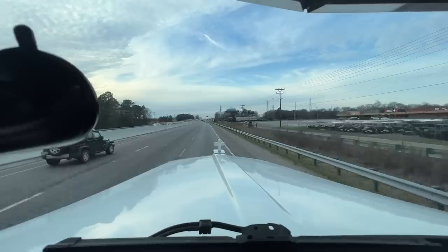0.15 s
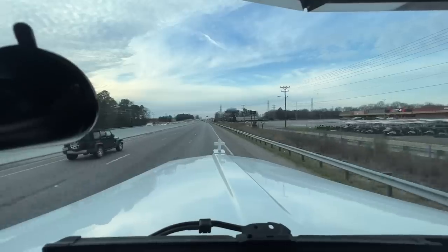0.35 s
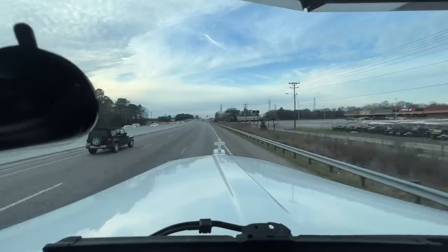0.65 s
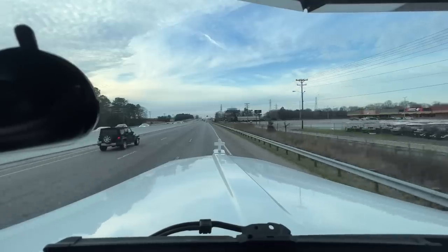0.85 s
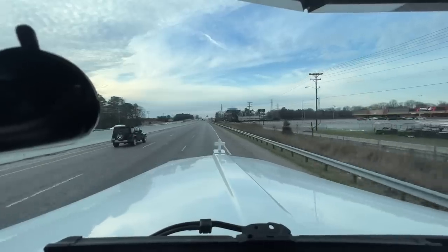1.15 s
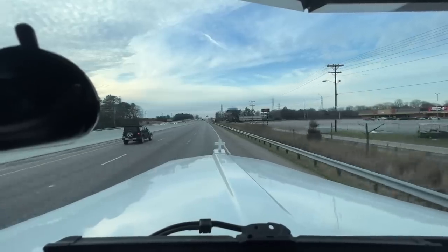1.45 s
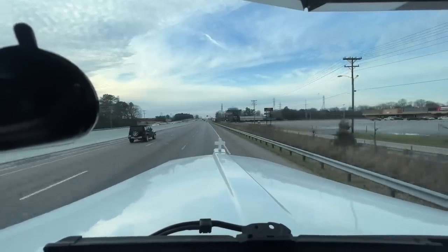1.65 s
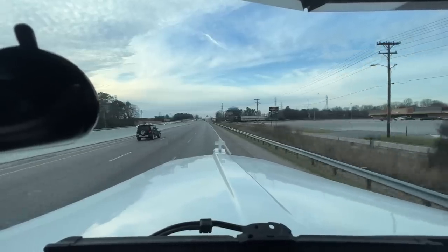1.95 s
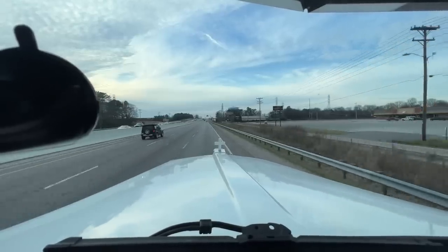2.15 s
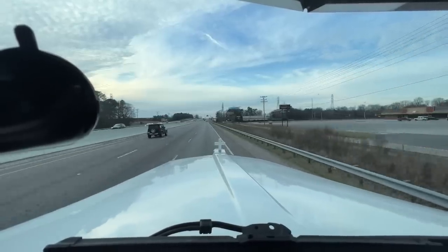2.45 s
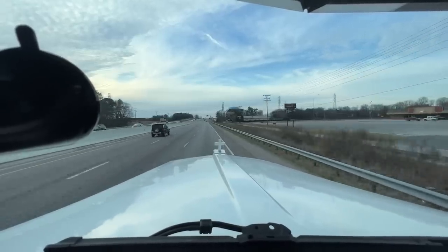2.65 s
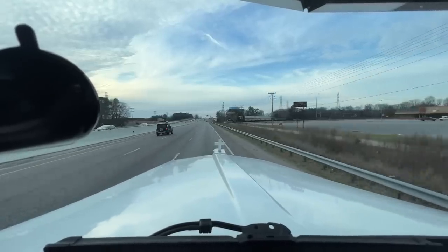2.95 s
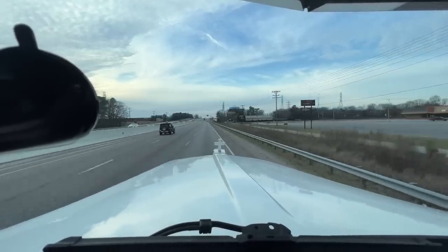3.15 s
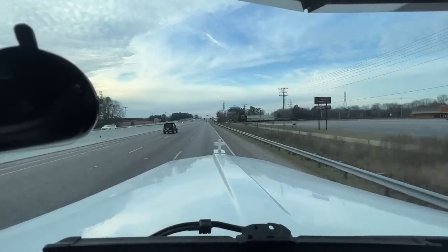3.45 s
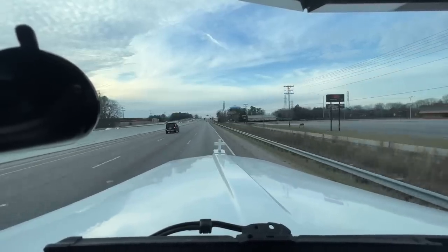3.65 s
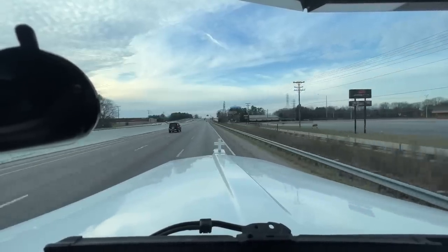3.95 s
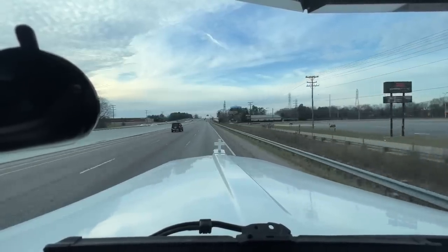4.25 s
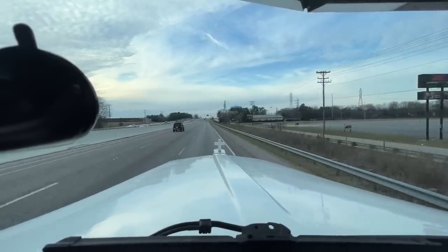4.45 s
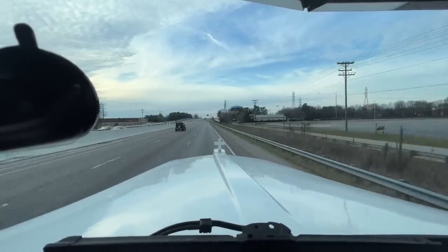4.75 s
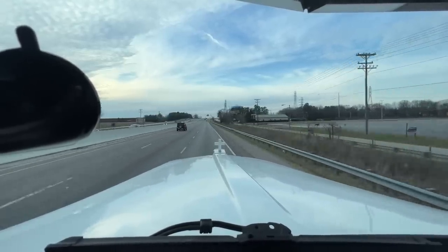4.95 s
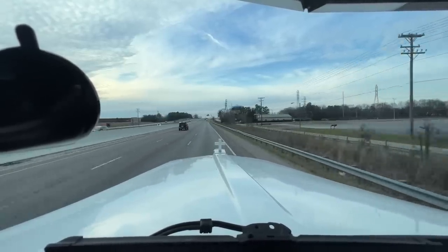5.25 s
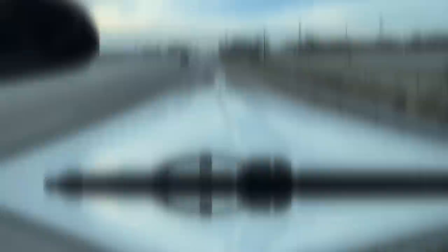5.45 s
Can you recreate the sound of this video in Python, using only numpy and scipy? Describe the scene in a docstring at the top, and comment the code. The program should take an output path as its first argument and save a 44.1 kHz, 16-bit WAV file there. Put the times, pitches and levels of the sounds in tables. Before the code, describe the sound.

Heavy diesel drone and road rumble in a cab, turbo whistle sagging and climbing around a gear change, then an abrupt droning, hissing end.

```python
"""A six-cylinder truck diesel heard in the cab: it pulls, lifts off for an upshift and pulls again at lower revs.
Shaft orders are sines through cab booms; firing-modulated noise roars and noise bursts knock, both in the panels.
Under them: shaped-noise road rumble and air rush, and a jittered-sine turbo whistle that sags and spools up.
Near the end a lower drone cuts in with a click, air spurts out and a panel is tapped. Two microphones."""
import sys
import numpy as np
from scipy import signal
from scipy.fft import rfft, irfft, next_fast_len
from scipy.io import wavfile
from scipy.ndimage import uniform_filter1d, map_coordinates

SR = 44100
rng = np.random.default_rng(int(sys.argv[2]) if len(sys.argv) > 2 else 0)


def wrap_up_sound(samples):
    """Save the sound to the file named by the first command line argument, as 16-bit audio."""
    columns = np.atleast_2d(samples).T
    # keep every value between -1 and 1, then stretch to whole-number steps
    tamed = np.clip(columns, -1, 1)
    steps = np.round(tamed * 32767).astype(np.int16)
    wavfile.write(sys.argv[1], SR, steps)


N = 247401
TIME = np.arange(N) / SR

# crankshaft speed: time_s, turns_per_s
SPEED_CURVE = [(0, 27.7), (1.15, 28.55), (1.6, 28.3), (1.72, 27.8), (1.9, 26.6), (2.0, 25.1), (2.11, 23.6),
               (2.27, 24.5), (2.65, 24.4), (3.05, 24.22), (5.61, 25.62)]
# reference level of roar and knock: time_s, level_db
COMBUSTION_LEVEL = [(0.0, -34.5), (0.06, -34), (0.48, -35), (0.6, -34.5), (0.65, -37), (0.68, -33.5),
                    (1.19, -36.5), (1.95, -46), (2.6, -46), (2.9, -41.5), (3.3, -39), (3.79, -37),
                    (5.4, -36)]
# combustion noise spectrum before the panels: freq_hz, relative_db_per_hz
ROAR_SPECTRUM = [(60, -28.5), (150, 1), (280, 5), (360, -5.5), (430, 2), (500, -3), (570, -8), (660, -1),
                 (750, -4.5), (850, -3.5), (1050, -12.5), (1180, -15.5), (1600, -10), (2000, -17.5),
                 (2600, -24.5), (4000, -66.5)]
# panel resonances: freq_hz, width_hz, boost_db
PANEL_MODES = [(634, 42, 5.5), (735.3, 19, 10), (794, 21, 1.5), (889, 17, 5), (1046, 59, 6.5),
               (1164, 21, 0.5), (1320, 22, 5.5), (1430, 23, 6.5), (1670, 37, 6.5), (1760, 47, 2),
               (1967, 46, 5.5)]


def amp(db):
    """Amplitude factor of a level in dB."""
    return 10 ** (np.asarray(db) / 20)


def unit(x):
    """x scaled to rms 1."""
    return x / np.sqrt(np.mean(x ** 2) + 1e-20)


def along(points, hz):
    """(Hz, value) points interpolated on a log frequency axis."""
    f, v = np.transpose(points)
    return np.interp(np.log(hz + 1), np.log(f + 1), v)


def curves(rows):
    """One value per sample for each column after the time."""
    s, *cols = np.transpose(rows)
    return [np.interp(TIME, s, c) for c in cols]


def wobble(knots_per_s):
    """Random curve, linear between normally distributed knots."""
    knots = rng.standard_normal(int(N * knots_per_s / SR) + 4)
    return map_coordinates(knots, [TIME * knots_per_s], order=1)


def filtered(x, response, ends="odd"):
    """x times a complex response of frequency; mirrored ends keep the edges quiet."""
    pad = 4096
    x = np.pad(x, [(0, 0)] * (x.ndim - 1) + [(pad, pad)], mode="reflect", reflect_type=ends)
    m = next_fast_len(x.shape[-1] + 2 * pad)
    spectrum = rfft(x, m) * response(np.fft.rfftfreq(m, 1 / SR))
    return irfft(spectrum, m)[..., pad:pad + N]


def lifted(x, modes):
    """x with a resonant boost in dB at each (Hz, width Hz, dB) mode."""
    def response(f):
        return amp(sum(db / (1 + (2 * (f - hz) / width_hz) ** 2) for hz, width_hz, db in modes))
    return filtered(x, response)


def rush(spectrum, patchy_db):
    """Two partly alike shaped noises of rms 1, with random gain patches in time and frequency."""
    # likeness of the two sides: freq_hz, coherence_0_to_1
    likeness = [(60, 0.73), (200, 0.76), (300, 0.081), (550, 0.81), (900, 0.48), (1300, 0.082),
                (1600, 0.61), (2500, 0.06), (5000, 0.1), (9500, 0.091)]
    z = signal.stft(rng.standard_normal((2, N)), nperseg=512)[2]
    patches = uniform_filter1d(rng.standard_normal(z.shape[1:]), 5, 0)
    patches = unit(uniform_filter1d(patches, 10, 1))
    both = signal.istft(z * amp(patchy_db * patches), nperseg=512)[1][:, :N]

    def response(hz):
        turn = np.arccos(np.clip(along(likeness, hz), 0, 1)) / 2
        return amp(along(spectrum, hz)) * [np.cos(turn), np.sin(turn)]
    mid, side = filtered(both, response, ends="even")
    return unit(np.array([mid + side, mid - side]))


def pair(x, late_rad):
    """Both microphones: level balance, and the left one late by late_rad(Hz)."""
    # left minus right: freq_hz, balance_db
    balance = [(60, -0.5), (110, -2.5), (148, -2.5), (168, -6.5), (200, -6.5), (228, -1), (265, -12.5),
               (350, -8), (410, -5), (480, -3.5), (800, -4), (1100, -2), (1350, -6.5), (2000, -3),
               (3330, -6), (5500, -13.5), (9080, -2.5), (15000, 1.5)]
    side = np.array([[.5], [-.5]])
    return filtered(x, lambda hz: amp(side * along(balance, hz)) * np.exp(-1j * side * late_rad(hz)))


def standing(hz):
    """Phase for sound filling the cab: standing waves put the microphones in step or in opposition."""
    # freq_hz, left_lag_rad
    standing_phase = [(60, .35), (110, .1), (155, -.45), (190, .2), (240, .4), (265, 3.1), (355, 3.4),
                      (380, 6.3), (445, 6.2), (470, 3.1), (1120, 3.4), (1200, 6), (1390, 5.8), (1440, 3.1),
                      (2100, 3.6)]
    return along(standing_phase, hz)


def direct(lag_ms):
    """Phase for sound arriving straight from one side: a pure delay."""
    return lambda hz: 2 * np.pi * hz * lag_ms / 1000


def aside(hz):
    """Phase for the whistle, which comes from one side and off the glass."""
    # freq_hz, left_lag_rad
    whistle_phase = [(7150, 6), (7950, 5.4), (9380, 5), (10100, 3.65), (11150, 2.1), (12150, 0),
                     (12900, -1.3), (13600, -2.6)]
    return along(whistle_phase, hz)


def crank_turns():
    """Crankshaft turns so far: the integral of its speed."""
    return np.cumsum(curves(SPEED_CURVE)[0]) / SR


def road():
    """Tyre rumble through the humming floor, and air rushing past the cab and the intake."""
    # tyre noise: freq_hz, relative_db_per_hz
    road_spectrum = [(20, -58.5), (40, -1.5), (62, 8.5), (85, -3), (120, 5), (200, -9), (300, -8.5),
                     (450, -13.5), (620, -15), (800, -59.5)]
    # cab floor resonances: freq_hz, width_hz, boost_db
    floor_modes = [(63.4, 4.4, 7), (128, 12, 4)]
    # air noise: freq_hz, relative_db_per_hz
    air_spectrum = [(1000, -2), (2500, 4.5), (3500, 3), (5000, -1), (7000, -2), (8200, -7.5), (9400, -10),
                    (10200, -56), (11200, -17.5), (12800, -27.5), (15000, -52.5)]
    # air rush before its overall gain: time_s, relative_level_db
    air_level = [(0.0, -42), (0.01, -44.5), (0.7, -44.5), (1.26, -47), (1.72, -51.5), (2.85, -55),
                 (2.92, -52), (4.3, -47), (5.38, -46.5)]
    air_gain_db = 4
    rumble = unit(lifted(rush(road_spectrum, patchy_db=2.0), floor_modes))
    rumble = amp(-28.5 + 1.3 * wobble(3.5)) * rumble
    return rumble + amp(curves(air_level)[0] + air_gain_db) * rush(air_spectrum, patchy_db=1.18)


def turbo():
    """Compressor whistle: a thin line that frays into a band of air noise as the rotor runs faster."""
    # time_s, whistle_hz
    whistle_pitch = [(0, 13600), (.6, 13560), (.95, 13450), (1.1, 13250), (1.3, 12900), (1.5, 12150),
                     (1.7, 11150), (1.95, 9500), (2.2, 8330), (2.47, 7260), (2.66, 7150), (2.8, 7260),
                     (2.95, 7720), (3.3, 8930), (3.8, 10450), (4.2, 11470), (4.5, 11880), (5, 12270),
                     (5.61, 12430)]
    # before flicker and haze: time_s, level_db
    whistle_level = [(0, -53), (1.1, -55), (1.5, -61), (1.72, -53.5), (1.85, -55), (2.1, -56), (2.3, -59.5),
                     (2.5, -50.5), (2.65, -60), (2.85, -53), (3, -61), (3.3, -57), (3.5, -59), (3.67, -43),
                     (3.8, -56), (4.3, -57), (5.61, -58)]
    fray_hz = 9500  # fraying grows quickly above this pitch
    hz, = curves(whistle_pitch)
    glide_hz = uniform_filter1d(hz, size=SR // 10, mode="nearest")  # the rotor's inertia rounds every change
    fray = 1 + (glide_hz / fray_hz) ** 3
    jitter_hz = 17 * fray * wobble(140)
    angle = 2 * np.pi * np.cumsum(glide_hz + jitter_hz) / SR
    haze = unit(filtered(rng.standard_normal(N), lambda f: 1 / (1 + (f / 550) ** 4), ends="even"))
    flicker = amp(3 * wobble(40) + 2.5 * wobble(12))
    envelope = amp(curves(whistle_level)[0]) * (flicker + .2 * fray * haze)
    return envelope * np.sqrt(2) * np.sin(angle)


def puff():
    """Spurts of air: each rises fast, falls slower and swishes around its own pitch."""
    # broad hiss: freq_hz, relative_db_per_hz
    puff_spectrum = [(2500, -7.5), (4500, -5), (6500, -1), (8000, -3), (10200, -9.5), (11200, -17),
                     (15500, -37.5)]
    # spurts: peak_s, envelope_peak_db, centre_hz
    spurts = [(5.44, -37.5, 4760), (5.455, -38.5, 6630), (5.461, -47, 4870), (5.466, -37.5, 6300),
              (5.477, -42.5, 5600), (5.49, -45, 5500)]
    rise_db_per_s, fall_db_per_s = 2500, 1500
    width_octaves, hiss_share = .7, .6
    air, out = rush(puff_spectrum, patchy_db=2.5), 0
    for s, db, hz in spurts:
        edges_hz = hz * 2 ** (width_octaves * np.array([-.5, .5]))
        band = signal.butter(1, edges_hz, "band", fs=SR, output="sos")
        envelope = amp(db - np.maximum(rise_db_per_s * (s - TIME), fall_db_per_s * (TIME - s)))
        swish = unit(signal.sosfilt(band, air))
        out = out + envelope * (swish + hiss_share * air)
    return out


def tap():
    """A tapped panel: one decaying sine."""
    start_s, pitch_hz, level_db, t60_s = 5.527, 760, -23, .06
    t = np.clip(TIME - start_s, 0, None)
    return amp(level_db - 60 * t / t60_s) * np.sin(2 * np.pi * pitch_hz * t)


def ending():
    """A lower drone and its roar start abruptly with a decaying step as click; puff and tap follow."""
    # steady tones: pitch_hz, rms_db
    drone_tones = [(44, -35), (65, -16.5), (87, -24), (108, -21.5), (130, -18), (175, -36), (222, -28),
                   (330, -31)]
    # low booms the drone swells into: centre_s, pitch_hz, peak_db
    low_booms = [(5.429, 96, -16), (5.523, 80, -13.5), (5.559, 116.6, -8.5)]
    start_s, boom_sigma_s = 5.412, .014
    since = np.clip(TIME - start_s, 0, None)
    drone = np.zeros(N)
    for hz, db in drone_tones:
        level = amp(db + 2.4 * wobble(4.3)) * np.sqrt(2)
        drone += level * np.sin(2 * np.pi * hz * TIME + rng.uniform(0, 2 * np.pi))
    for s, hz, db in low_booms:
        bell = amp(db) * np.exp(-.5 * ((TIME - s) / boom_sigma_s) ** 2)
        drone -= bell * np.cos(2 * np.pi * hz * (TIME - s))
    onset = 1 - np.exp(-since / 0.0013)
    click = np.exp(-since / 0.001) * (since > 0) * amp([[-20], [-10]])  # left, right
    noise = amp(-29) * unit(lifted(rush(ROAR_SPECTRUM, patchy_db=2.5), PANEL_MODES))
    return pair(onset * (drone + noise), standing) + pair(puff() + tap(), direct(lag_ms=-0.2)) + click


def roar():
    """Combustion noise rings in the panels and swells a little at every firing and twice a turn."""
    roar_gain_db = 6.5  # over the combustion level
    angle = 2 * np.pi * crank_turns()
    firing = 1 + 0.034 * np.cos(3 * angle) + 0.019 * np.cos(2 * angle)
    noise = unit(lifted(firing * rush(ROAR_SPECTRUM, patchy_db=1.53), PANEL_MODES))
    return amp(curves(COMBUSTION_LEVEL)[0] + roar_gain_db) * noise


def knock():
    """Every firing raps the block with a noise burst; cylinders differ in strength, and the panels ring."""
    # rap spectrum before the panels: freq_hz, relative_db_per_hz
    knock_spectrum = [(450, -59.5), (600, -1), (800, 7.5), (1150, -8), (1600, -16), (2600, -21),
                      (4500, -27.5), (6000, -57.5)]
    knock_gain_db = -8  # over the combustion level
    cylinder_spread_db, firing_spread_db = 3, 2
    firings = np.floor(3 * crank_turns()).astype(int)  # three a turn
    at = np.flatnonzero(np.diff(firings))
    cylinders_db = cylinder_spread_db * unit(rng.standard_normal(6))
    raps = np.zeros(N)
    raps[at] = amp(cylinders_db[firings[at] % 6] + firing_spread_db * rng.standard_normal(len(at)))
    t = np.arange(SR // 20) / SR
    block = rng.standard_normal((2, len(t))) * amp(-60 * t / 0.05)
    rung = signal.fftconvolve(raps[None], block, axes=1)[:, :N]
    rung = filtered(rung, lambda hz: amp(along(knock_spectrum, hz)))
    return amp(curves(COMBUSTION_LEVEL)[0] + knock_gain_db) * unit(lifted(rung, PANEL_MODES))


def half_orders(angle, high_db):
    """Weak, unsteady sines between the shaft orders, from unequal cylinders."""
    # order, gain_db over high_db
    half_pattern = [(3.5, -19), (4.5, -10), (5.5, -20), (6.5, -17), (7.5, -19), (8.5, -22), (10.5, -14),
                    (11.5, -21), (13.5, -21), (15.5, -24)]
    out = np.zeros(N)
    for k, db in half_pattern:
        phase = rng.uniform(0, 2 * np.pi) + .4 * wobble(5)
        out += amp(db + high_db + 2 * wobble(6)) * np.sin(k * angle + phase)
    return out


def clutch_shudder():
    """Decaying sine as the clutch bites."""
    # level_db, t60_s
    level_db, t60_s = (-27, 0.74)
    start_s, pitch_hz = 2.74, 246
    t = np.clip(TIME - start_s, 0, None)
    return amp(level_db - 60 * t / t60_s) * (1 - np.exp(-t / 0.012)) * np.sin(2 * np.pi * pitch_hz * t)


def engine():
    """Shaft orders as sines locked to the crank, through the booms of the cab, plus half orders."""
    # order group gains: time_s, orders_1_to_4_db, order_5_db, higher_orders_db
    order_gains = [(0.0, -25.5, -22, -18.5), (0.6, -26.5, -24, -22), (1.2, -26, -26.5, -25),
                   (1.45, -26, -45, -29), (1.6, -30, -37.5, -38.5), (1.72, -31, -34.5, -37.5),
                   (1.83, -26.5, -37.5, -35), (1.95, -26.5, -31, -53), (2.1, -28.5, -28, -50),
                   (2.55, -34.5, -32, -45), (2.7, -30, -25.5, -39.5), (2.82, -28, -29.5, -24),
                   (2.95, -23.5, -32.5, -21), (3.15, -24, -27.5, -19), (3.5, -22, -23.5, -20),
                   (4.1, -21, -29, -19), (4.7, -19.5, -26, -19), (5.3, -22.5, -28, -19.5),
                   (5.45, -17.5, -26.5, -18), (5.6, -31, -25.5, -18)]
    # pattern before the shift: order, relative_db
    fast_pattern = [(1, -28), (2, -22), (3, 0.5), (4, 3.5), (5, -4), (6, -1.5), (7, -6.5), (8, -2),
                    (9, -8.5), (10, -1.5), (11, -11), (12, -14), (13, -27), (14, -9), (15, -18), (16, -18),
                    (17, -8), (18, -26)]
    # pattern after the shift: order, relative_db
    slow_pattern = [(1, -47), (2, -21.5), (3, 1), (4, -8), (5, 0), (6, 1.5), (7, -11.5), (8, -11),
                    (9, -9.5), (10, -12.5), (11, -9.5), (12, -19.5), (13, -11.5), (14, -24.5), (15, -22),
                    (16, -18), (17, -14.5), (18, -20), (19, -15.5), (20, -37)]
    # pattern with fuel off: order, relative_db
    coast_pattern = [(2, -20), (3, 2), (4, -0.5), (5, -4), (6, -10.5), (7, 2.5), (8, -2), (9, -2.5),
                     (10, 4), (11, -3), (12, -10.5), (13, 1.5), (14, -10), (15, -25)]
    # pattern mix, the rest coasts: time_s, fast_share, slow_share
    shift_mix = [(1.45, 1, 0), (1.7, 0, 0), (2.68, 0, 0), (2.9, 0, 1)]
    # time_s, driveline_unloaded_0_to_1
    unloading = [(1.25, 0), (1.5, 1), (2.7, 1), (3.1, 0)]
    # narrow cab booms: freq_hz, width_hz, boost_db
    cab_modes = [(102.1, 2, 6.5), (146.9, 5.5, 5), (203, 5.8, 11), (253.95, 6.4, 13), (290.3, 6.2, 5.5),
                 (340.6, 12, 6.5), (408.7, 8.6, 2), (425.5, 8.2, 8), (450, 4.5, 2.5)]
    smear_rad = .6  # per order squared, outside the fast pattern: the thump of each turn is spread out
    uneven_rad = 1.5  # fast pattern, orders between the firing orders: one of three pulses a turn is stronger
    loose_db, loose_rad, loose_knots_per_s = 3.5, .7, 7  # off load: flicker in level, drift in phase
    firm_orders = 11  # orders below this loosen less
    low_db, fifth_db, high_db = curves(order_gains)
    angle = 2 * np.pi * crank_turns()
    fast, slow = curves(shift_mix)
    unloaded, = curves(unloading)
    fast_db, slow_db, coast_db = dict(fast_pattern), dict(slow_pattern), dict(coast_pattern)
    orders = np.zeros(N)
    for k in slow_db:
        db = fast * fast_db.get(k, -35) + slow * slow_db[k] + (1 - fast - slow) * coast_db.get(k, -25)
        if k < 5:
            db = db + low_db - 0.5
        elif k == 5:
            db = db + fifth_db
        else:
            db = db + high_db - 2
        loose = unloaded * min(1, k / firm_orders)
        thump = smear_rad * k * k + np.pi  # pi: the pulse draws the air in first
        to_fast = np.angle(np.exp(1j * (uneven_rad * (k % 3 > 0) - thump)))  # shortest way round
        drift = (.012 * k + loose_rad * loose) * wobble(loose_knots_per_s)
        flicker_db = (.4 + .1 * k + loose_db * loose) * wobble(loose_knots_per_s)
        orders += amp(db + flicker_db) * np.sin(k * angle + thump + fast * to_fast + drift)
    return lifted(orders + clutch_shudder(), cab_modes) + half_orders(angle, high_db)


def scene():
    """Cab-filling sound, the whistle from one side, and the ending."""
    cab = engine() + roar() + knock() + road()
    return pair(cab, standing) + pair(turbo(), aside) + ending()


def record(dry):
    """Rounds the highest peaks, fades both ends and removes everything above the band limit."""
    top_hz, fade_s = 15900, .002
    soft = dry / (1 + np.abs(dry) ** 8) ** (1 / 8)
    soft = soft * np.clip(np.minimum(TIME, TIME[::-1]) / fade_s, 0, 1)
    return filtered(soft, lambda hz: hz < top_hz)


dry = scene()
out = record(dry)
wrap_up_sound(out)
```